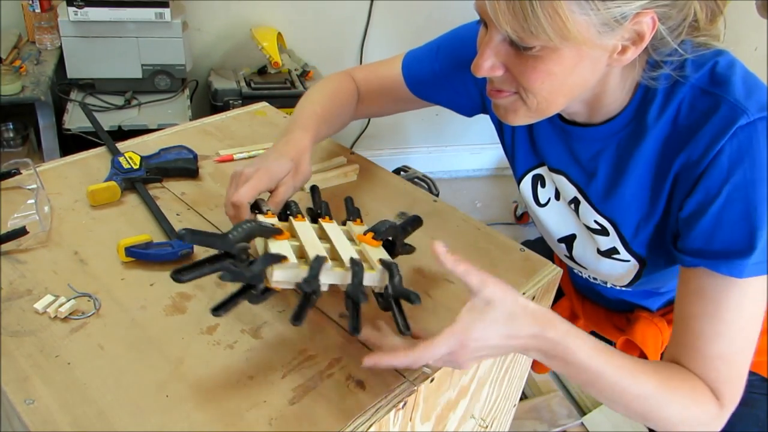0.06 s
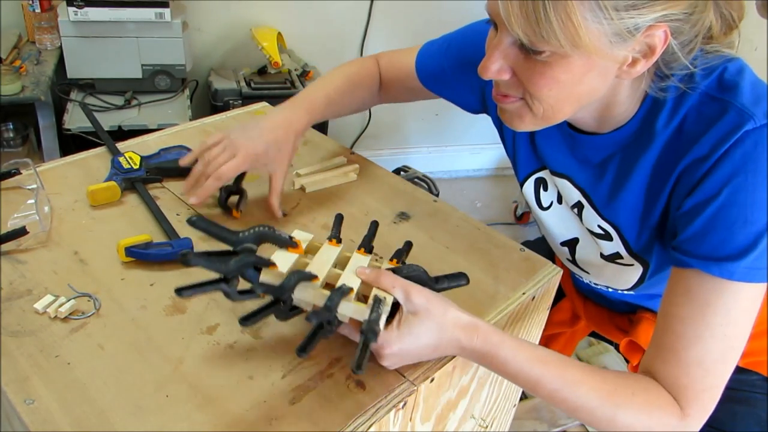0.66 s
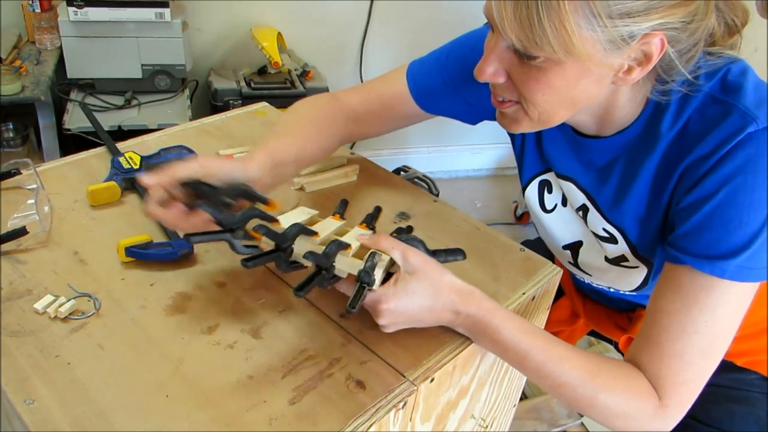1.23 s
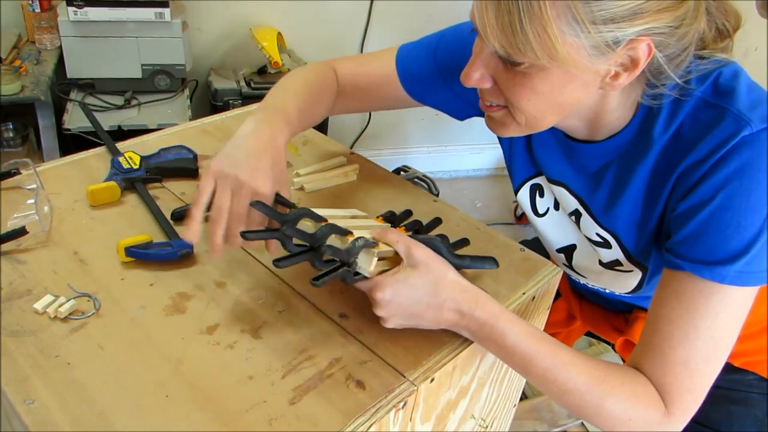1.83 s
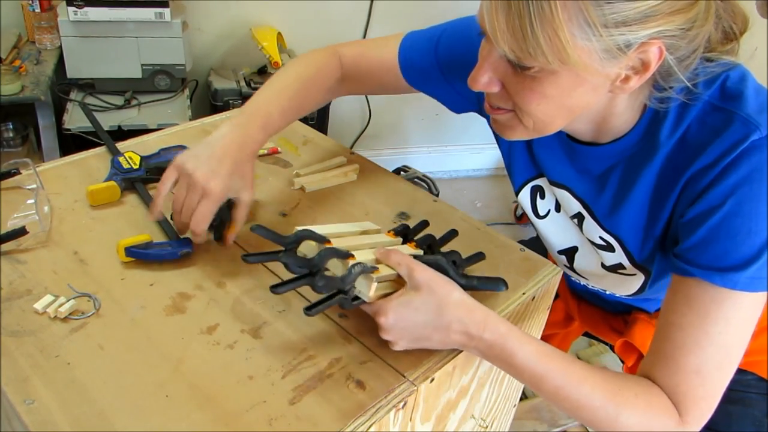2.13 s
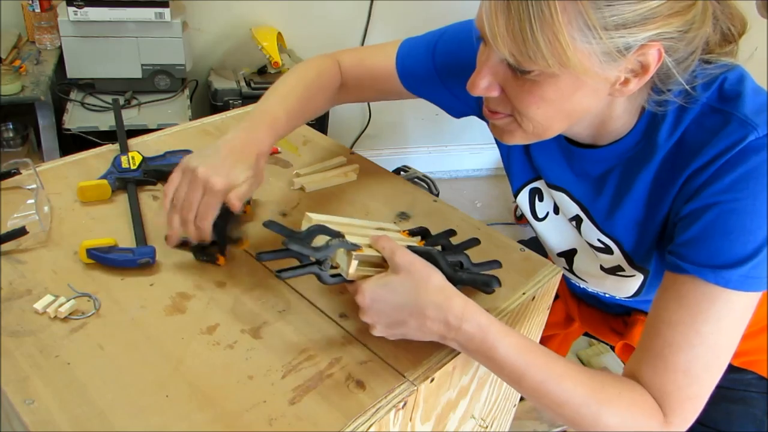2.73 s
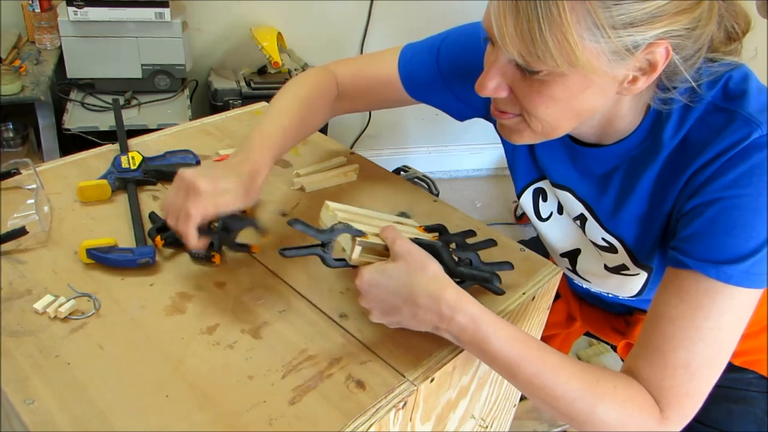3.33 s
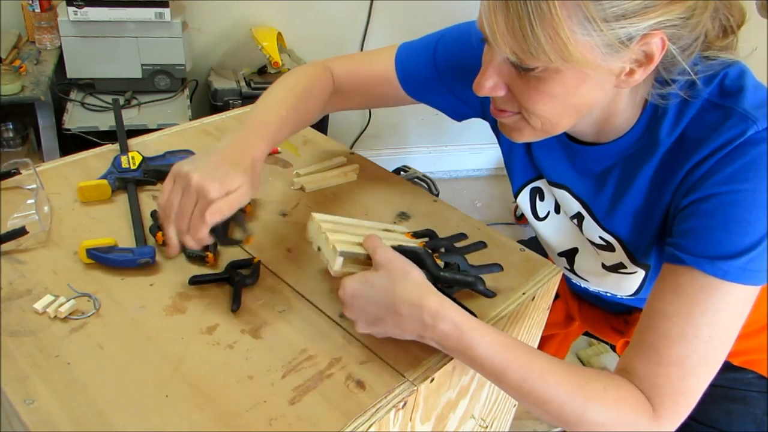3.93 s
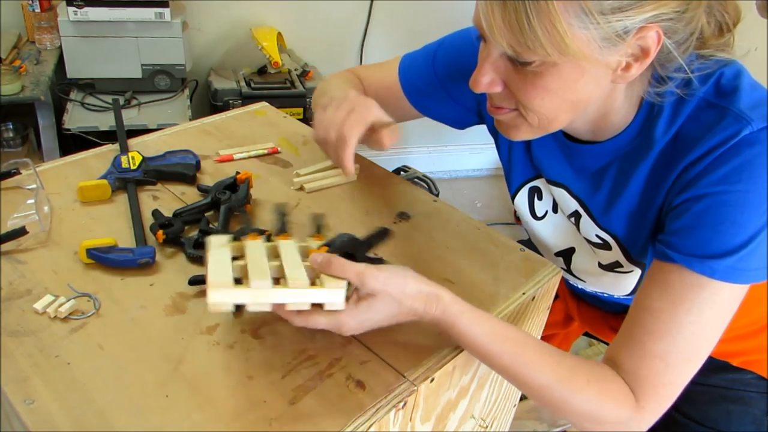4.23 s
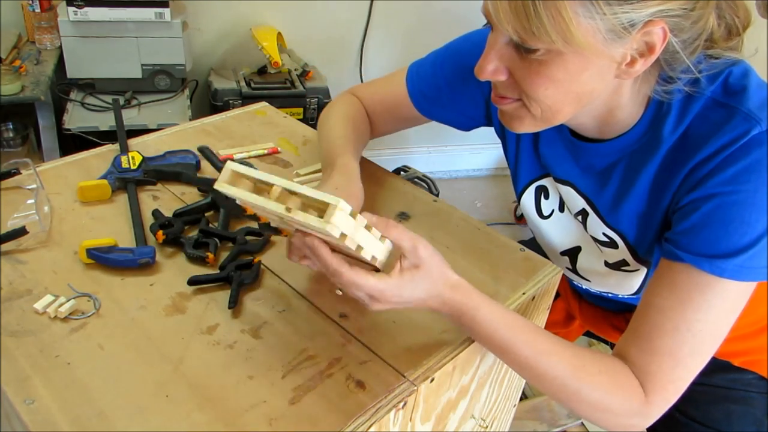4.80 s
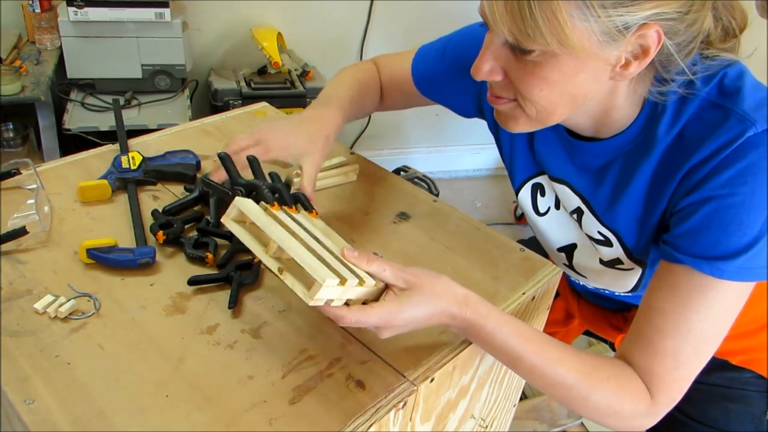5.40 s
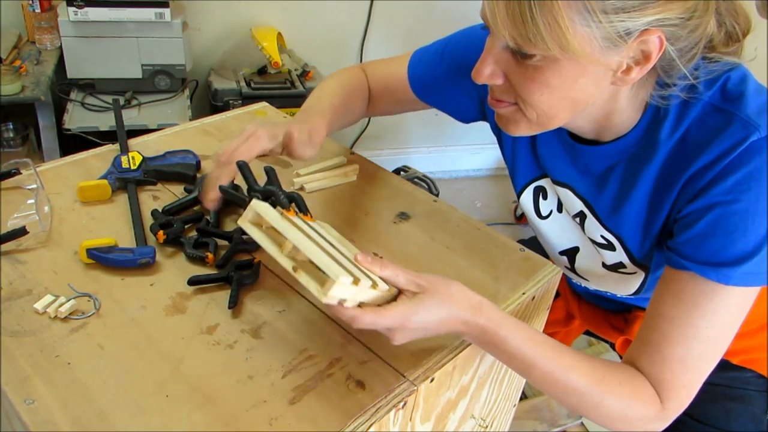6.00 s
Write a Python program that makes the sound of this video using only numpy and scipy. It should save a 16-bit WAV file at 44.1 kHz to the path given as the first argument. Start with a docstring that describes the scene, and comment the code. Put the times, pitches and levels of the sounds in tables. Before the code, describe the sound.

Plastic spring clamps are pulled off a small wooden piece one after another. Their jaws scrape faintly over the wood and snap shut with a sharp click, then each clamp bounces on a plywood workbench or a heap of other clamps with hollow clacks and light thuds. The clatter comes in quick bursts, with a short lull after the middle. It sounds close, in a small, lively workshop with a faint low rumble.

```python
"""Spring clamps dropped on a workbench

Plastic spring clamps are pulled off a small wooden pallet: their jaws scrape over the wood and snap shut.
Each clamp bounces and clatters on a plywood bench and on the growing heap: flat landings shake the
bench, hard edges crack and tick. A small, lively workshop rings with every knock over a low rumble."""
import sys
import numpy as np
from scipy import signal
from scipy.fft import rfft, irfft, next_fast_len
from scipy.io import wavfile

SR = 44100
rng = np.random.default_rng(int(sys.argv[2]) if len(sys.argv) > 2 else 0)


def digitize_waveform(pressure):
    """Quantize a signal to 16-bit integers and store it at the path in sys.argv[1].

    Rows of a 2-D input are taken as channels; values are limited to [-1, 1].
    """
    field = np.atleast_2d(pressure).T
    bounded = np.clip(field, -1, 1)
    quanta = np.round(bounded * 32767).astype(np.int16)
    wavfile.write(sys.argv[1], SR, quanta)


N = 271259
T = np.arange(18000) / SR  # time axis of one hit, s

# clamps hitting the bench and each other: t/s, level/dB, weight/dB, hardness/dB, clack f/Hz
LANDINGS = [(.6217, -34.5, 4.5, -4, 590), (.7108, -28, 4, 2, 590), (.7319, -27, -2, 7.5, 1670),
            (.757, -28, 1.5, -22, 1080), (.7883, -35.5, 0, -10, 980), (.842, -41.5, 12.5, -11, 1010),
            (.8543, -42.5, -1, 4.5, 800), (.8672, -33, -4, 1, 980), (1.4938, -35, 7.5, -1, 545),
            (1.499, -39, 9.5, 4.5, 2000), (1.5857, -30, -7, 2.5, 1030), (1.5893, -30.5, 11, 9.5, 1035),
            (1.6308, -40, 19.5, -12, 1030), (1.706, -32.5, 6.5, 1, 493), (1.7303, -36, 5, -5, 610),
            (1.7653, -28, 1.5, -6.5, 2150), (1.8015, -40, -2, -12, 2300), (1.8241, -36, 3, -3, 506),
            (1.8426, -36.5, 13, -2.5, 460), (1.8522, -31.5, -2.5, 2.5, 2300), (2.2026, -48, 17, 11, 476),
            (2.2197, -31.5, 1, 4.5, 744), (2.2574, -43, 13, 12, 1940), (2.2702, -38, 12.5, 1.5, 460),
            (2.2996, -46, 20.5, 1, 580), (2.3815, -23, -16.5, -9, 902), (2.4163, -42.5, -7, 0, 920),
            (2.457, -43, 12.5, 0.5, 880), (2.6534, -36.5, 6, -11, 890), (2.6831, -43, -2, -5, 470),
            (2.7721, -30.5, 2, 2, 746), (2.7755, -27.5, -5.5, -16, 944), (2.8616, -35, 4, 6, 1750),
            (2.8739, -40.5, -12, 12, 620), (2.8996, -32, -3, 2, 1650), (3.2597, -38.5, -6.5, 8, 2970),
            (3.4145, -32, 5, 2.5, 820), (3.419, -36, -22, 7.5, 690), (3.4376, -23, -15, -2.5, 1330),
            (3.4398, -24.5, -25, -14, 940), (3.535, -39, -8, 0, 1560), (3.5724, -33.5, -6, 0, 650),
            (3.6495, -29.5, -10, -2.5, 700), (3.6901, -34, -12, -5, 634), (4.0254, -35, 6, 3.5, 1200),
            (4.0543, -30.5, 1.5, 1.5, 860), (4.0769, -28.5, -6, 3.5, 865), (4.098, -39.5, 0, 5, 940),
            (4.1571, -35.5, 4.5, -5.5, 1720), (4.2098, -23.5, -11, 0, 1700), (4.3324, -49.5, -12, 11, 1070),
            (4.4695, -49, -4, -32, 740), (5.222, -46.5, 8, 1, 680), (5.2779, -40.5, 7, 5, 490),
            (5.2987, -30, 7, 0, 1800), (5.3098, -38.5, 5, -4, 940), (5.4131, -28.5, 4, -3.5, 2100),
            (5.42, -31.5, 2, -1, 530), (5.4427, -24, -11, 5.5, 2730), (5.4921, -43.5, 10, 4, 2300),
            (5.7902, -60.5, 17, -21, 520), (5.9306, -31, 5, 5, 1405), (5.9446, -38.5, -8, 13, 644),
            (5.9886, -29.5, 4.5, -1.5, 620), (6.1334, -35, 3, -1, 1630)]


def knocks(landings, typical_db=-34.5, db_per_halving=19.5):
    """Each landing is a clack in layers: weight goes into the bench, hardness into the plastic."""
    out = np.zeros((2, N))
    for s, db, weight_db, hard_db, clack_hz in landings:
        # blows stronger than typical have a shorter contact
        time_scale = 2 ** -(max(db - typical_db, 0) / db_per_halving)
        boom = at_level(bench_boom(), -4 + 0.89 * weight_db)
        thud = place(at_level(bench_thud(), 1.63 + 0.54 * weight_db), width=0.11)
        clack = place(at_level(body_clack(clack_hz, time_scale)), width=0.2)
        crack = place(at_level(edge_crack(time_scale), -7 + hard_db), width=0.3)
        tick = place(at_level(edge_tick(), -19.5 + 1.8 * hard_db), width=0.51)
        add(out, s, undb(db) * (boom + thud + clack + crack + tick))
    return out


# hollow tone of the clamp body: f/Hz, level/dB
CLACK_EQ = [(250, -22), (450, -10), (650, 2.5), (1000, -3), (1500, 4), (2000, 3), (2600, -8.5), (4000, -27),
            (8000, -56)]


def body_clack(hz, time_scale, ring_cycles=22):
    """The clamp rings briefly at a pitch set by the side it lands on, with the bench's upper modes."""
    burst = contact(t60=0.02 * time_scale, chatter_db=-41, chatter_t60=0.051, rise_s=0.0015 * time_scale)
    body = at_level(colour(burst, CLACK_EQ))
    note = ring(hz, t60=ring_cycles / hz, db=0.5)
    wood = at_level(bench_modes(580, SR, spread_db=0), -1)
    stiffness = max(hz / 900, 0.8)  # a stiffer point of contact lifts the whole clack
    return band(body + note + wood, 460 * stiffness ** 0.5, 1850 * stiffness ** 0.53)


# bite of a hard plastic edge: f/Hz, level/dB
CRACK_EQ = [(900, -34), (1800, 13.5), (2500, 2), (3500, 7), (4300, 2.5), (5200, 1), (6800, -4), (8500, -42),
            (12000, -22)]


def edge_crack(time_scale, handle_hz=3070):
    """Hard edge on hard edge: a broad crack around one stiff mode of the handle."""
    burst = contact(t60=0.0032 * time_scale, chatter_db=-25, chatter_t60=0.1 * time_scale,
                    rise_s=0.0016 * time_scale)
    crack = colour(burst, CRACK_EQ)
    focused = crack + undb(1) * resonate(crack, handle_hz, q=1)
    return at_level(focused) + ring(handle_hz, t60=0.0027, db=-9.5)


# bright top of the contact: f/Hz, level/dB
TICK_EQ = [(3500, -1.5), (6000, -7), (7300, -1), (10000, -8), (13000, -13.5), (16000, -23)]


def edge_tick():
    """A hard contact adds a thin tick with a tail of chatter."""
    return colour(contact(t60=0.0062, chatter_db=-20, chatter_t60=0.11), TICK_EQ)


def contact(t60, chatter_db, chatter_t60, rise_s=0.00073):
    """Hard plastic touches in a brief burst; the loose hinge and spring chatter after it."""
    envelope = (fade(t60) + undb(chatter_db) * fade(chatter_t60)) * np.clip(T / rise_s, 0, 1)
    return rng.standard_normal(len(T)) * envelope


# modes of the plywood bench: f/Hz, level/dB, t60/s
PLYWOOD_MODES = [(110.5, -5, 0.19), (138.7, 4, 0.27), (150.8, -12.5, 0.33), (160.6, -12.5, 0.2),
                 (184.4, -7, 0.13), (227.5, -4, 0.26), (256, -6.5, 0.25), (295, 1, 0.066),
                 (314, -2.5, 0.072), (337.7, -1.5, 0.27), (341, 7, 0.028), (373, -8.5, 0.17),
                 (419, -1, 0.1), (437.3, -4.5, 0.27), (488.2, 4, 0.18), (507, -6, 0.11), (654.8, 8, 0.094),
                 (742, -22, 0.078), (853, -16.5, 0.072), (926, 5.5, 0.099), (1004, 3.5, 0.093),
                 (1140, -1, 0.12), (1263, -1, 0.12), (1418, -1.5, 0.19), (1544, 1, 0.018),
                 (1720, -8.5, 0.064), (1870, -3, 0.16), (2126, 2.5, 0.067)]


def bench_modes(lo_hz, hi_hz, spread_db):
    """Every spot on the board pushes each mode in a range with its own strength and sign."""
    modes = np.array([undb(db) * np.sin(2 * np.pi * hz * T) * fade(t60)
                      for hz, db, t60 in PLYWOOD_MODES if lo_hz <= hz < hi_hz])
    pushes = rng.choice([-1, 1], len(modes)) * undb(spread_db * rng.standard_normal(len(modes)))
    return pushes @ modes


def bench_boom():
    """The whole top sways at its lowest modes."""
    sway = at_level(bench_modes(0, 203, spread_db=1))
    return band(sway + ring(144, t60=0.039, db=1.5), 114, 300)


def bench_thud():
    """The board gives way under the blow and rings on."""
    dent = ring(343, t60=0.024, db=1) + ring(450, t60=0.056, db=-5.5)
    board = at_level(bench_modes(203, 580, spread_db=1.5))
    return band(dent + board, 170, 940)


# jaws snapping shut: t/s, click level/dB, click f/Hz, handles re click/dB
JAW_SNAPS = [(0.6447, -48.5, 10200, 11), (0.653, -52, 10700, 10.5), (2.1667, -26, 13000, -1.5),
             (2.577, -52, 10000, -8), (2.754, -28.5, 13600, 3.5), (3.41, -31, 13000, -2.5),
             (3.9635, -31.5, 11400, -2), (5.264, -58.5, 8900, 19.5), (5.278, -35.5, 7300, -14),
             (5.899, -40, 9000, 8.5), (5.9863, -39.5, 6900, -16)]
# tone of the ringing handles: f/Hz, level/dB
HANDLE_EQ = [(300, -12), (800, -4.5), (2000, -2), (3500, 5), (4500, 1), (6000, 0.5), (7300, 6.5),
             (9000, -14.5), (14000, 9.5)]


def snaps():
    """The spring slams the jaw pads together: a very high click over a short ring of the handles."""
    out = np.zeros((2, N))
    for s, db, hz, handles_db in JAW_SNAPS:
        slam = contact(t60=0.0022, chatter_db=-47, chatter_t60=0.013)
        click = resonate(resonate(slam, hz, q=2.2), hz, q=2)
        handles = colour(contact(t60=0.0039, chatter_db=-29, chatter_t60=0.19), HANDLE_EQ)
        add(out, s, place(at_level(click, db) + at_level(handles, db + handles_db), width=0.3))
    return out


# jaws sliding over wood: middle t/s, length/s, level/dB, centre f/Hz, sharpness/Q
JAW_SCRAPES = [(0.287, .16, -59, 4900, .86), (.45, 0.064, -52, 2620, .64), (1.222, 0.068, -45.5, 3300, .6),
               (1.291, .29, -53.5, 2170, 2.1), (1.985, 0.077, -53, 3600, .86),
               (2.436, 0.039, -54, 4700, 6.2), (2.627, 0.05, -51.5, 4660, 1.7),
               (3.241, 0.038, -57.5, 5850, .75), (3.795, 0.069, -60.5, 7000, .93),
               (4.771, 0.19, -66, 7000, .6), (4.967, 0.15, -70, 4950, .81), (5.068, 0.058, -57, 3450, 1.8),
               (5.101, .04, -43, 3460, 2.8), (5.703, 0.029, -63, 7000, .89)]


def scrapes(slips_per_s=900, spread_db=4):
    """Pads stick and slip over the grain in dense, uneven ticks; a tight jaw squeaks."""
    out = np.zeros(N)
    for s, length, db, hz, q in JAW_SCRAPES:
        n = int(length * SR)
        slips = (rng.random(n) < slips_per_s / SR) * undb(spread_db * rng.standard_normal(n))
        rub = resonate(slips + 0.14 * rng.standard_normal(n), hz, q)
        stroke = (resonate(rub, hz, q / 2) + 2.7 * rub) * np.hanning(n)
        add(out, s - length / 2, stroke * undb(db) / stroke.std())
    return out


# reverb of the workshop: f/Hz, level/dB, t60/s, side re mid/dB
REVERB_BANDS = [(80, -23, 0.69, -38), (198, -10, 0.72, -19), (494, -5, 0.58, -9.5), (1070, -0.5, 0.4, -10),
                (2000, -5, 0.5, -9), (3800, -5, 0.51, -7), (8500, -3.5, 0.26, -1.5),
                (14500, -10, 0.14, 5.5)]


def workshop(dry, build_s=0.0021, gap_s=0.0024):
    """The room adds a close reflection and a dense tail that is wider and shorter in the treble."""
    hz = np.arange(len(T) // 2 + 1) * SR / len(T)
    octave = np.log2(np.clip(hz, 80, 80 * 2 ** 7.5) / 80)
    noise, tail = rfft(rng.standard_normal((2, len(T)))), 0
    swell = np.clip((T - gap_s) / build_s, 0, 1)
    for centre in np.arange(16) / 2:  # half-octave bands up from 80 Hz
        db, t60, side_db = (on_log_axis(80 * 2 ** centre, REVERB_BANDS, column) for column in (1, 2, 3))
        band_noise = irfft(noise * np.maximum(1 - 2 * abs(octave - centre), 0), len(T))
        envelope = swell * fade(t60)
        mid, side = band_noise * envelope / np.linalg.norm(envelope)
        tail = tail + undb(db) * (mid + undb(side_db) * side * np.array([[1], [-1]]))
    wet = signal.oaconvolve(dry.mean(axis=0)[None], tail, axes=1)[:, :N]
    # only the short waves bounce cleanly off the nearest surface
    bright = signal.sosfilt(signal.butter(1, 1500, "high", fs=SR, output="sos"), dry)
    add(wet, 0.0064, undb(-13.5) * bright)
    return dry + wet


# tone of the low rumble: f/Hz, level/dB
RUMBLE_EQ = [(25, -20), (50, -9), (85, -7.5), (135, 2), (200, -6), (400, -9.5), (800, -19.5), (2000, -27),
             (6000, -37)]
# fader ride of the rumble: t/s, level/dB
RUMBLE_RIDE = [(0, -47), (.6, -46), (1.4, -45), (2.1, -49), (3.1, -52.5), (3.8, -52), (4.6, -56.5),
               (5.1, -49), (5.75, -56), (6.15, -47)]
# tone of the room's hiss: f/Hz, level/dB
HISS_EQ = [(25, -3), (60, 3), (130, -7), (250, -6.5), (500, -11), (1000, -9.5), (2000, -15.5),
           (5000, -16.5), (10000, -25.5), (14000, -39), (16000, -50.5)]


def room_tone(hum_hz=119):
    """A slowly changing rumble under thin, steady hiss, with a faint hum."""
    t = np.arange(N) / SR
    rumble = stereo_noise(RUMBLE_EQ) * undb(np.interp(t, *np.transpose(RUMBLE_RIDE)))
    hiss = undb(-57.5) * stereo_noise(HISS_EQ)
    hum = undb(-57) * np.sin(2 * np.pi * hum_hz * t)
    return rumble + hiss + hum


def stereo_noise(eq):
    """Wide coloured noise, narrowest around 110 Hz."""
    size = next_fast_len(N, True)
    hz = np.arange(size // 2 + 1) * SR / size
    mid, side = rfft(rng.standard_normal((2, size))) * undb(on_log_axis(hz, eq))
    side = side * undb(on_log_axis(hz, [(30, 1), (110, -7.5), (500, 2), (4000, -1.5)]))
    noise = irfft(np.array([mid + side, mid - side]), size)[:, :N]
    return noise / noise.std()


def ring(hz, t60, db, rise_s=0.00052):
    """One damped mode, pushed up over the time of contact."""
    return at_level(np.sin(2 * np.pi * hz * T) * fade(t60) * np.clip(T / rise_s, 0, 1), db)


def place(x, width):
    """A glance off the bench top, a little different for each hit, reaches left and right unequally."""
    glance = np.concatenate([np.zeros(rng.integers(8, 40)), x])[:len(x)]
    return x + width * rng.choice([-1, 1]) * glance * np.array([[1], [-1]])


def colour(x, eq, size=1024):
    """Minimum-phase EQ, so attacks stay sharp."""
    hz = np.arange(size // 2 + 1) * SR / size
    cepstrum = irfft(np.log(undb(on_log_axis(hz, eq))))
    cepstrum[1:size // 2] *= 2
    cepstrum[size // 2 + 1:] = 0
    return signal.fftconvolve(x, irfft(np.exp(rfft(cepstrum))))[:len(x)]


def resonate(x, hz, q):
    """One resonance, with Q held at 1 or more."""
    return signal.lfilter(*signal.iirpeak(hz, max(q, 1), fs=SR), x)


def band(x, lo_hz, hi_hz):
    """Band-pass with steep sides."""
    return signal.sosfilt(signal.butter(3, [lo_hz, hi_hz], "band", fs=SR, output="sos"), x)


def on_log_axis(hz, table, column=1):
    """Read one column of a table along log frequency."""
    table = np.array(table)
    return np.interp(np.log(hz + 1), np.log(table[:, 0]), table[:, column])


def at_level(x, db=0):
    """Scale a hit so that its first 20 ms have this RMS level."""
    return x * undb(db) / np.sqrt(np.mean(x[:SR // 50] ** 2))


def fade(t60):
    """Exponential decay, 60 dB down after t60 seconds."""
    return np.exp(-np.log(1000) * T / t60)


def undb(db):
    """Decibels to gain."""
    return 10 ** (np.asarray(db) / 20)


def add(track, s, sound):
    """Mix a sound into a track at time s."""
    i = max(int(s * SR), 0)
    track[..., i:i + sound.shape[-1]] += sound[..., :max(N - i, 0)]


def scene():
    """Clamps and bench in the workshop; the knocks fall on three spots in turn, each with its own echoes."""
    clatter = sum(workshop(knocks(LANDINGS[spot::3])) for spot in range(3))
    return clatter + workshop(snaps() + scrapes()) + room_tone()


def record(dry):
    """The microphone has two narrow dips and a falling top end."""
    for hz, q in [(3950, 13.8), (7950, 35)]:
        dry = signal.lfilter(*signal.iirnotch(hz, q, fs=SR), dry)
    softened = signal.sosfilt(signal.butter(10, 13900, fs=SR, output="sos"), dry)
    return signal.sosfilt(signal.ellip(8, 0.2, 70, 15600, fs=SR, output="sos"), softened)


dry = scene()
out = record(dry)
digitize_waveform(out)
```